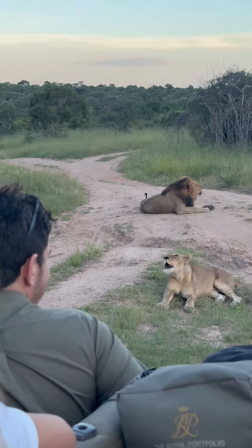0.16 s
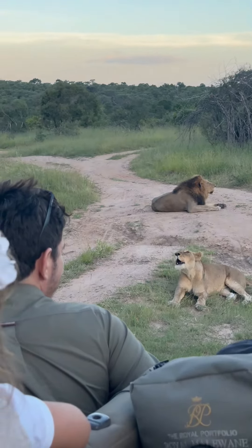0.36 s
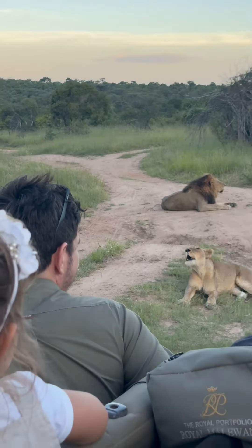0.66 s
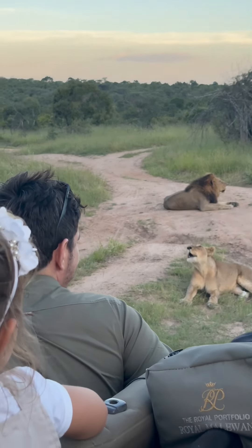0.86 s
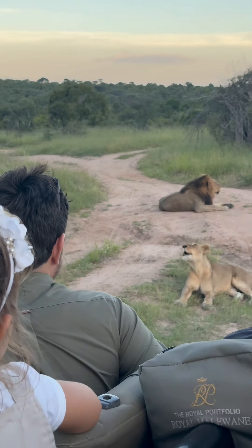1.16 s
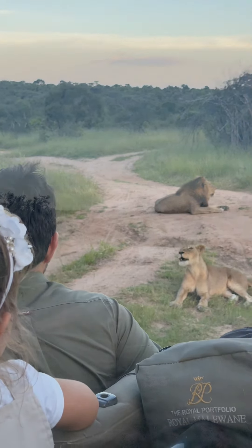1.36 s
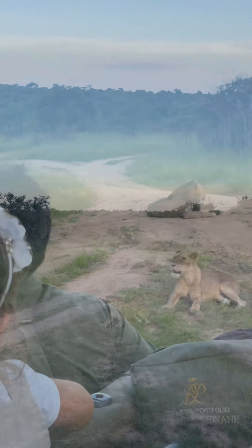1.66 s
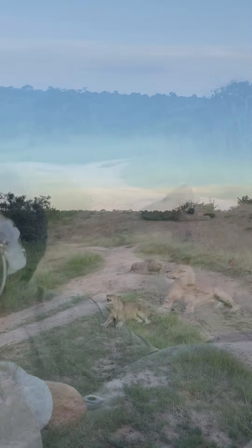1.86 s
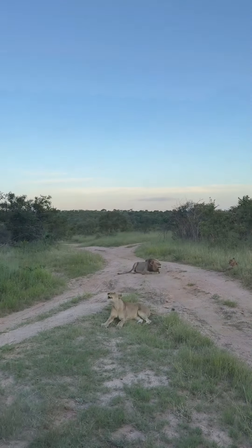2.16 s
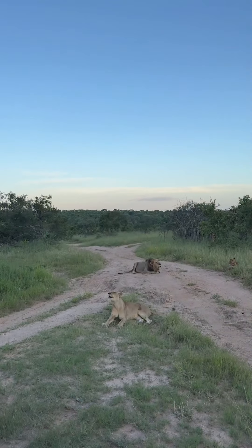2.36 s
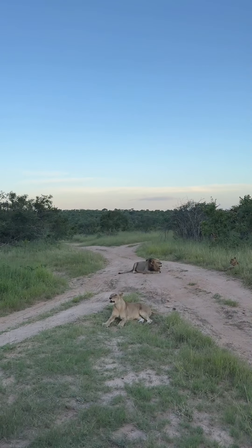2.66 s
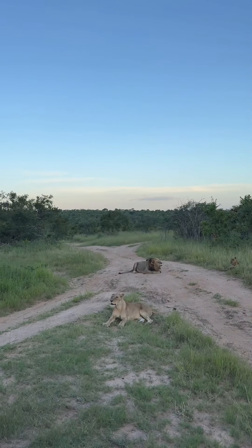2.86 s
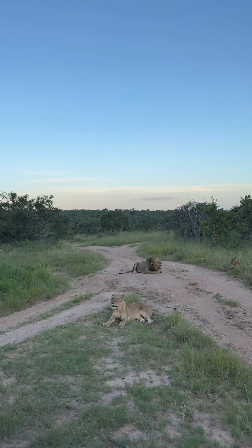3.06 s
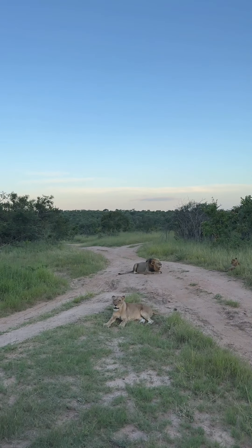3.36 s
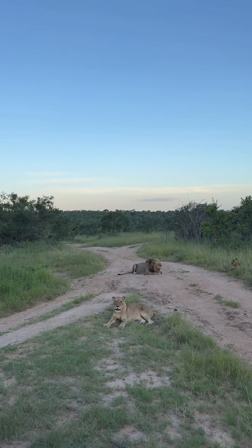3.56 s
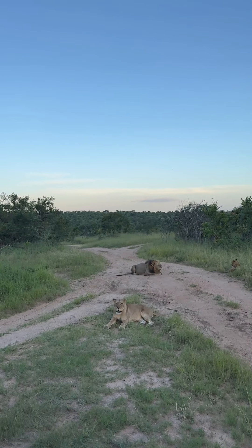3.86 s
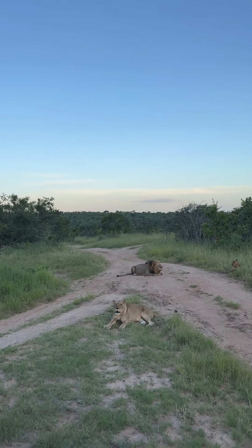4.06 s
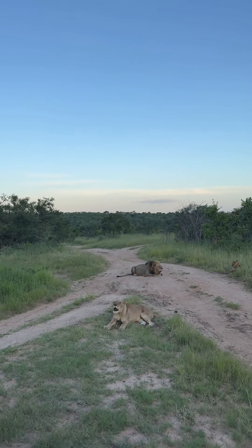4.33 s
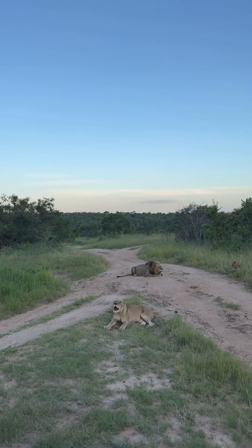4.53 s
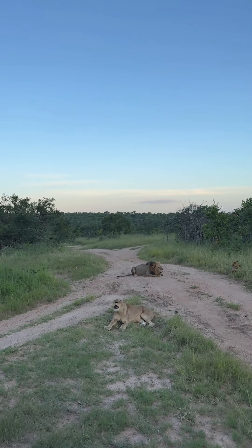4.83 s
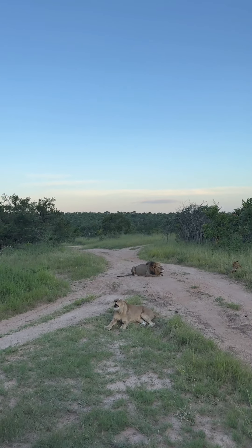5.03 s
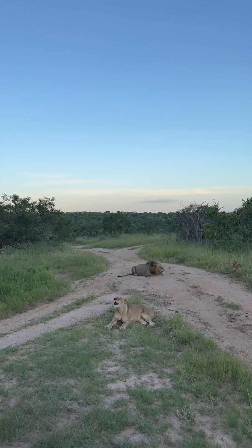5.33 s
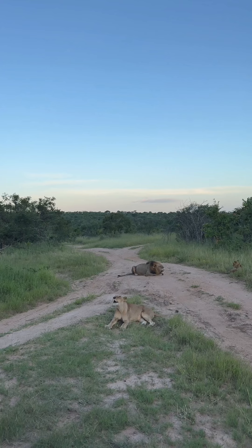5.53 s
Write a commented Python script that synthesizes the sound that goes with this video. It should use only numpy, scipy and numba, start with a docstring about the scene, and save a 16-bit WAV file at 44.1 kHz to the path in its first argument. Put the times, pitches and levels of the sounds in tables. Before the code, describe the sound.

Two lions roar in turn near a handheld stereo microphone: three heavy falling bellows in quick succession, the first facing, the next off to the left. A gap of about one second leaves low rumble, soft hiss and thin descending bird whistles. Then a throaty moan climbs, roughens into a creak and breaks into a last loud bellow, cut off in its growl. Short diffuse outdoor echo.

```python
"""Two lions roar close by in open bush: creaky swells and full bellows that fall into a growl.
Vocal folds give a harmonic stack; turbulent air, puffed unevenly, rasps through throat and mouth resonances.
Loose tissue flaps and slaps in the growl, near-pure chest notes glide beneath, and small birds whistle.
The bush rumbles, hisses and echoes briefly; a microphone pair turns aside after the first roar,
and the loudest cycles flatten near full scale."""
import sys
import numpy as np
from scipy import signal
from scipy.fft import rfft, irfft
from scipy.io import wavfile
from scipy.ndimage import uniform_filter1d
from numba import njit

SR = 44100
rng = np.random.default_rng(int(sys.argv[2]) if len(sys.argv) > 2 else 0)


def file_out(sig):
    """Save sig as 16-bit WAV at sys.argv[1]."""
    # one column per channel
    cols = np.atleast_2d(sig).T
    # limit, then scale
    lim = np.clip(cols, -1, 1)
    pcm = np.round(lim * 32767).astype(np.int16)
    wavfile.write(sys.argv[1], SR, pcm)


N = 250929

# vocal tract: (time [s], mouth opening [0-1], first resonance [Hz], airflow offset [dB])
THROAT = [(0, 0.52, 460, 2), (.3, 0.24, 463, 1.5), (.6, 0.06, 453, 4), (.95, 0.08, 442, 2),
          (1.2, 0.03, 386.4, 1), (1.345, 0.04, 393, -0.5), (1.365, 1, 447, -5), (1.55, .7, 442, 4.5),
          (1.72, 0.3, 452, -0.5), (1.901, 0.05, 427, 0.5), (2.3, 0.02, 391, -1.5), (2.36, 0.01, 395, -4),
          (2.42, 0, 387.4, -11.5), (2.5, 0.2, 387.4, -3), (2.62, 0.3, 381.6, -2), (2.85, 0.27, 357, -4.5),
          (3.0, 0.2, 337, 3.5), (3.2, 0.12, 317, 8.5), (4.12, 0.23, 393.3, 4), (4.3, 0, 429.5, 6),
          (4.39, 0.3, 406, 2.5), (4.46, 0.7, 416, -1), (4.62, 0.7, 424, 1.5), (4.68, 0.93, 457, -4),
          (4.76, 0.86, 490, -3), (4.86, 0.7, 485, 6.5), (4.97, 0.52, 456, 4), (5.05, 0.1, 470, -1),
          (5.12, 0.1, 447, -5.5), (5.33, 0.07, 401, 0.5), (5.42, 0.07, 405, 1), (5.46, 0.03, 403, -5),
          (5.52, 0, 417, -0.5), (5.62, 0.02, 412, -4), (5.69, 0.01, 418, -3.5)]
# mouth resonances facing, turned aside and wide open: (centre [Hz], width per pass [Hz], relative level [dB])
MOUTH_FACING = [(2215, 120, -1), (2518, 130, -6.5), (2940, 260, -9.5), (3450, 290, -7), (3940, 470, -6.5),
                (4750, 1700, -11.5), (6300, 1000, -7), (7120, 320, -8.5), (7800, 510, -7),
                (8730, 1000, -8.5), (10070, 1800, -9)]
MOUTH_ASIDE = [(2270, 540, -2), (2860, 620, -4.5), (3400, 240, -2), (3900, 1300, -6.5), (4710, 530, -8.5),
               (5140, 1500, -1), (6600, 1100, -10.5), (8730, 3300, -4)]
MOUTH_WIDE = [(2820, 270, -3.5), (3440, 270, -8.5), (4630, 760, -10.5), (5240, 390, -19), (5870, 450, -6),
              (6950, 1000, -13.5), (8050, 2000, -9.5), (9600, 2600, -8.5)]


def undb(db):
    """Decibels to amplitude ratio: 20 dB is a factor of ten."""
    return 10 ** (np.asarray(db) / 20)


def unit(x):
    """Normalisation to a root-mean-square of one."""
    return x / np.sqrt(np.mean(x ** 2))


@njit
def svf(x, hz, width):
    """Second-order resonator: a state-variable band-pass with moving centre and width, gain 1 at the centre."""
    y, b, l = np.empty(len(x)), 0., 0.
    for i in range(len(x)):
        g, k = np.tan(np.pi * hz[i] / SR), width[i] / hz[i]
        v = (b + g * (x[i] - l)) / (1 + g * (g + k))
        b, l, y[i] = 2 * v - b, l + 2 * g * v, k * v
    return y


def ring(x, hz, width, db):
    """Cascaded resonance: two equal passes steepen the skirts."""
    hz, width = hz * np.ones(len(x)), width * np.ones(len(x))
    return undb(db) * unit(svf(svf(x, hz, width), hz, width))


def walk(n, rate):
    """Low-passed random fluctuation: levels held 1 / rate s, smoothed twice; spread near 1."""
    k = int(SR / rate)
    held = np.repeat(rng.standard_normal(n // k + 1), k)
    return 1.3 * uniform_filter1d(uniform_filter1d(held, k), k)[:n]


def read(table, fade_s=0.037):
    """Linear interpolation of a time curve: its sample range, columns and edge fades."""
    s, *columns = np.transpose(table)
    at = np.arange(int(s[0] * SR), min(int(s[-1] * SR), N))
    t = at / SR
    # no fade where the curve meets either end of the sound
    since_start, until_end = t - s[0] + (at[0] == 0), s[-1] - t + (at[-1] == N - 1)
    fade = np.clip(np.minimum(since_start, until_end) / fade_s, 0, 1)
    return at, [np.interp(t, s, c) for c in columns], fade


def on_hz(table, hz):
    """Spectral interpolation on a logarithmic frequency axis."""
    f, v = np.transpose(table)
    return np.interp(np.log(hz + 1), np.log(f + 1), v)


def bush():
    """Spectrally shaped noise: wavering rumble and hiss, most alike left and right in the bass."""
    # ambient spectrum before overall scaling: (frequency [Hz], relative level [dB])
    spectrum = [(18, -33.5), (30, -4), (66, -4), (134, -17), (245, -33), (461, -40), (526, -46),
                (2750, -47), (5740, -47.5), (7670, -49.5), (9710, -71), (16000, -70.5)]
    rms_db = -58.5
    hz = np.fft.rfftfreq(N, 1 / SR)
    shape = undb(on_hz(spectrum, hz))
    mid, side = (rfft(rng.standard_normal(N) * undb(1.5 * walk(N, 6.4))) * shape for _ in range(2))
    side_share = np.clip(hz / 2500, .1, 1)
    both = irfft(mid + side_share * side * np.array([[1], [-1]]), N)
    return unit(both) * undb(rms_db)


def reverberate(x, tail, db):
    """Reverberation as convolution with decaying noise, scaled by the mean energy of the two tails."""
    tail = tail / np.sqrt(np.sum(tail ** 2) / 2) * undb(db)
    return signal.fftconvolve(x[None], tail, axes=1)[:, :N]


def bush_echo(x):
    """Diffuse echo: close ports hear nearly the same bass, so mainly the treble differs."""
    t60_s, level_db, top_hz = 0.57, -24, 3000
    t = np.arange(SR) / SR
    # the first 12 ms stay silent
    mid, side = rng.standard_normal((2, SR)) * np.exp(-np.log(1000) * t / t60_s) * (t > .012)
    side = signal.sosfilt(signal.butter(1, 900, "high", fs=SR, output="sos"), side)
    tail = signal.sosfilt(signal.butter(1, top_hz, fs=SR, output="sos"), [mid + side, mid - side])
    return reverberate(x, tail, level_db)


def scatter(x):
    """Early scattering: brief treble reflections off nearby seats and bodies, different at each port."""
    t60_s, level_db, low_hz = 0.042, -2, 2160
    t = np.arange(int(SR * t60_s)) / SR
    tail = rng.standard_normal((2, len(t))) * np.exp(-np.log(1000) * t / t60_s)
    bright = signal.sosfilt(signal.butter(2, low_hz, "high", fs=SR, output="sos"), x)
    return reverberate(bright, tail, level_db)


def two_ports(x, left_lead, left_excess_db):
    """Interaural-type cues: phase lead [rad] and level difference [dB], split between the two ports."""
    half = np.array([[.5], [-.5]])
    return irfft(rfft(x) * undb(half * left_excess_db) * np.exp(1j * half * left_lead), N)


def microphone_pair(x):
    """Directional hearing: arrival phase and shading crossfade as the pair turns and the source changes."""
    # phase when facing: (frequency [Hz], left lead [rad])
    facing_phase = [(60, 0), (6500, 0), (7400, -.3), (8700, -1.4), (11000, -2.0)]
    # phase side-on: (frequency [Hz], left lead [rad])
    side_phase = [(60, .2), (200, .11), (520, .4), (800, -.1), (2100, 0), (2800, -.8), (3400, .4),
                  (4000, 1.5), (4700, -1.0), (7400, -1.6), (10000, -2.7)]
    # shading side-on: (frequency [Hz], left minus right level [dB])
    side_level = [(60, -0.5), (110, 1), (200, 1), (520, 1.5), (700, 10), (900, 2), (1450, 0.5), (1750, 0.5),
                  (2600, 1), (3400, -5.5), (4400, 4), (8000, 0.5)]
    # a roar from far to the left: (frequency [Hz], left lead [rad], left minus right level [dB])
    left_cues = [(200, .1, 1.5), (370, .5, 3), (700, 2.0, 3), (900, .1, 6), (1150, .6, 14), (1450, 0, 8),
                 (1750, .5, 1), (2400, 2.5, 2), (3400, 1.7, -4), (4000, -1.8, 0), (9000, -2.6, 1)]
    turn_s = 1.3, 1.6  # from facing to side-on
    left_until_s = 2.36, 2.46  # the second roar is at the left, then the sound moves to the side-on cues
    facing_scatter = 0.1  # share of the scatter heard while facing
    t, hz = np.arange(N) / SR, np.fft.rfftfreq(N, 1 / SR)
    facing = two_ports(x, on_hz(facing_phase, hz), 0)
    side_on = two_ports(x, on_hz(side_phase, hz), on_hz(side_level, hz))
    left_hz, left_phase, left_db = np.transpose(left_cues)
    left = two_ports(x, np.interp(hz, left_hz, left_phase), np.interp(hz, left_hz, left_db))
    turned = left + np.interp(t, left_until_s, (0, 1)) * (side_on - left)
    turn = np.interp(t, turn_s, (0, 1))
    scatter_share = facing_scatter + (1 - facing_scatter) * turn
    return facing + turn * (turned - facing) + scatter_share * scatter(x)


def whistle(table, flutter_db, rate, fade_s):
    """Frequency modulation: a lone sine follows a pitch curve while its level wavers."""
    at, (hz, db), fade = read(table, fade_s)
    level = undb(db + flutter_db * walk(len(at), rate))
    out = np.zeros(N)
    out[at] = np.sqrt(2) * fade * level * np.sin(2 * np.pi * np.cumsum(hz) / SR)
    return out


def birds():
    """Pure-tone whistles: thin glides, mostly falling, that steepen near the end."""
    # whistles: (start [s], length [s], first pitch [Hz], last pitch [Hz], level [dB])
    bird_calls = [(1.403, 0.048, 3730, 4270, -58), (1.442, 0.07, 3050, 3230, -74),
                  (3.082, 0.19, 6300, 4000, -77.5), (3.405, .21, 6400, 3940, -79),
                  (3.506, 0.12, 6000, 5350, -86), (3.73, .2, 6300, 3900, -79.5),
                  (3.998, 0.031, 5930, 5510, -83), (4.064, .2, 6300, 3900, -82)]
    knee_time, knee_glide = .76, .64  # shares of length and glide passed at the bend
    out = 0
    for s, length, first_hz, last_hz, db in bird_calls:
        knee_hz = first_hz + knee_glide * (last_hz - first_hz)
        curve = [(s, first_hz, db), (s + knee_time * length, knee_hz, db), (s + length, last_hz, db)]
        out = out + whistle(curve, 2.9, 40, fade_s=0.016)
    return out


def chest_notes():
    """Amplitude modulation: gliding sines whose throb deepens through each note."""
    # near-pure notes: (start [s], length [s], first pitch [Hz], last pitch [Hz],
    # first level [dB], last level [dB], signed throb depth at the end [dB])
    low_notes = [(.14, 0.46, 187.6, 188.2, -22.5, -26.5, 19.5), (1.76, 0.44, 122.9, 128.9, -21, -18.5, -3),
                 (4.122, .27, 99.7, 149, -39, -45, -11)]
    throb_hz, throb_turns = 9.5, 0.12  # rate and starting phase in cycles
    t, out = np.arange(N) / SR, 0
    for s, length, first_hz, last_hz, first_db, last_db, throb_db in low_notes:
        depth_db = throb_db * np.clip((t - s) / length, 0, 1)
        throb = depth_db * np.sin(2 * np.pi * (throb_hz * (t - s) + throb_turns))
        curve = [(s, first_hz, first_db), (s + length, last_hz, last_db)]
        out = out + undb(throb) * whistle(curve, 0.74, 5.8, fade_s=.06)
    return out


def throat(air, t, mouth, growl, first_db, second_hz, second_db, fourth_db):
    """Source-filter principle: air excites gliding throat formants, dull steady bands and mouth bands."""
    s, *columns = np.transpose(THROAT)
    opening, first_hz = (np.interp(t, s, c) for c in columns[:2])
    opening = np.clip(opening, 0, 1)
    # the third and fourth resonances sink as the mouth narrows, the fourth late
    third_hz = 1170.5 + (2052.5 - 1170.5) * opening
    third_db = -6.5 + (-7.5 + 6.5) * opening
    fourth_hz = 1800 + (2400 - 1800) * opening ** .7
    # flapping tissue blurs the resonances and damps the fourth
    blur, fourth_db = 1 + .7 * growl, fourth_db - 3 * growl
    rasp = ring(air, first_hz, 105 * blur, first_db) - ring(air, second_hz, 115 * blur, second_db)
    rasp = rasp + ring(air, third_hz, 130 * blur, third_db) - ring(air, fourth_hz, 190 * blur, fourth_db)
    rasp = rasp + ring(air, 211.5, 82, 6.7) + ring(air, 310, 72, -3.5)
    rasp = rasp - ring(air, 636, 150, -12.0) + ring(air, 1326, 280, -11.5)
    rasp = rasp + growl * ring(air, 1550, 600, -10)  # torn air fills the gaps between them
    # each treble band drifts and flickers at random on its own
    hiss = 0
    for k, (hz, width, db) in enumerate(mouth):
        drift_hz = hz * (1 + .012 * walk(len(t), 2.2))
        hiss = hiss + (-1) ** k * ring(air, drift_hz, width, db + 2.0 * walk(len(t), 17))
    return rasp, hiss


def slap_group(rows, mouth):
    """Impulsive excitation: short bursts of air ring throat and mouth; the harder, the brighter."""
    rise_s, fall_s, hard_db = 0.0034, 0.0098, -18.5  # a smoothed burst below hard_db loses treble
    t, gate = np.arange(N) / SR, np.zeros(N)
    for s, db in rows:
        gate += undb(db) * np.clip((t - s) / rise_s, 0, 1) * np.exp(-np.abs(t - s) / fall_s)
    air = gate * rng.standard_normal(N)
    rasp, hiss = throat(air, t, mouth, 1, first_db=14, second_hz=861, second_db=-2, fourth_db=-23)
    bright = np.sqrt(np.clip(uniform_filter1d(gate, size=600) / undb(hard_db), 0, 1))
    return np.sqrt(np.mean(gate ** 2)) * undb(-13.0) * (rasp + undb(-10.5) * bright * hiss)


def slaps():
    """Time-varying filtering: the hardest slaps of the growl ring three sets of mouth resonances in turn."""
    # slaps: (time [s], relative strength [dB])
    slap_rows = [(0.205, -25.5), (0.285, -23.5), (0.365, -19), (0.604, -20), (0.632, -24), (0.711, -16),
                 (1.095, -16.5), (1.131, -11), (1.156, -12), (1.189, -13), (1.204, -13), (1.226, -13),
                 (1.243, -17.5), (1.267, -28.5), (1.292, -28.5), (1.348, -26.5), (2.07, -19), (2.1, -17.5),
                 (2.143, -15), (2.218, -20.5), (2.263, -13), (2.294, -18.5), (2.326, -17.5), (2.385, -33),
                 (2.41, -31.5), (2.434, -35.5), (2.491, -28), (5.424, -21.5), (5.477, -16.5), (5.489, -7),
                 (5.507, -19.5), (5.553, -19.5), (5.581, -13.5), (5.598, -13), (5.639, -12.5)]
    aside_s, wide_s = 1.0, 4.64  # the mouth's colour changes at these times
    spans = (0, aside_s, MOUTH_FACING), (aside_s, wide_s, MOUTH_ASIDE), (wide_s, N / SR, MOUTH_WIDE)
    return sum(slap_group([row for row in slap_rows if a <= row[0] < b], mouth) for a, b, mouth in spans)


def lion(table, register, mouth, tract, tilt_db, air_db, edge_db, slide_s, rough, growl):
    """Phonation: folds ring as a harmonic stack, air rasps once a cycle, loose tissue flaps it into a growl.

    tract: the arguments of throat after growl; tilt_db: slope above the strongest partial [dB per octave];
    air_db, edge_db: rasp against voice and hiss against rasp before the later offsets [dB];
    rough, growl: depths [0-1] before and after the slide between two times slide_s [s].
    """
    at, (hz, db), fade = read(table)
    n, t = len(at), at / SR
    rough, growl = np.interp(t, slide_s, rough), np.interp(t, slide_s, growl)
    # a full growl spills more air, and duller air
    rasp_db = db + air_db + 12.5 * growl + np.interp(t, *np.transpose(THROAT)[[0, 3]])
    hiss_db = rasp_db + edge_db - 12.5 * growl
    phase = np.cumsum(hz * (1 + .06 * rough * walk(n, 150))) / SR
    flap_hz = 42.2 * (1 + .3 * walk(n, 30))
    flap = np.cumsum(flap_hz) / SR % 1
    puff = 1 - growl + 2.07 * growl * np.exp(-flap / 0.59) * undb(2.6 * walk(n, 40))

    lead_k, lead_db = max(register, key=lambda row: row[1])
    slope_db = tilt_db - 8 * growl
    stack = 0
    for k, d in register:
        # uneven folds make each partial flutter alone, higher ones more; a leading fundamental is steadier
        flutter = 0.69 if k == 1 == lead_k else 1 + .03 * k
        flutter_db = 5.46 * flutter * rough * walk(n, 70)
        # soft closure and growl tilt the upper partials down
        tilt = slope_db * max(np.log2(k / lead_k), 0)
        level = undb(flutter_db + d - lead_db + tilt)
        stack = stack + level * np.sin(2 * np.pi * (k * phase + rng.random()))
    soft_puff = uniform_filter1d(puff, size=300)
    voice = np.sqrt(2) * undb(db) * stack * (1 + 0.29 * (soft_puff - 1))

    jet = .8 + np.exp(-(phase % 1) / .25)  # air spurts as the folds part
    air = rng.standard_normal(n) * puff * jet * undb(1.9 * walk(n, 60))
    closure = uniform_filter1d(np.diff(np.floor(phase), prepend=0), size=3)  # the folds snap shut once a cycle
    air = air + .42 * (1 - rough) * puff * unit(closure) * undb(2.0 * walk(n, 200))
    rasp, hiss = throat(air, t, mouth, growl, *tract)
    rumble = growl * undb(rasp_db) * ring(air, 62, 30, -2.0)  # the flapping itself, felt in the chest
    out = np.zeros(N)
    out[at] = fade * (voice + undb(rasp_db - 3.0) * rasp + undb(hiss_db - 7.5) * hiss + rumble)
    return out


def roars():
    """Vocal registers: phrases differ in pitch, level and roughness; some share harmonic balance or mouth."""
    # phrases: (time [s], fold rate [Hz], strongest partial level [dB])
    creak_1, bellow_1 = [(0.0, 152, -22.5), (0.052, 152.6, -17), (0.304, 153, -16), (0.584, 144.6, -16.5),
                         (0.63, 137, -30.5)], [(0.54, 184.6, -27), (0.56, 184.1, -14), (0.61, 182.1, -8),
                                          (0.656, 179.6, -3.5), (0.904, 176.6, -3.5), (0.992, 157.1, -6.5),
                                          (1.198, 141.3, -6), (1.27, 118.8, -17), (1.38, 98.5, -36)]
    creak_2, bellow_2 = [(1.34, 79.23, -41.5), (1.564, 76.74, -34), (1.66, 71.8, -26.5),
                         (1.72, 69.2, -22.5)], [(1.67, 211, -37.5), (1.714, 194.9, -15), (1.79, 188.4, -10.5),
                                          (1.884, 186.5, -7.5), (2.188, 158, -7), (2.306, 139.8, -8.5),
                                          (2.38, 141.3, -13.5), (2.47, 134.3, -30)]
    mate_bellow, moan = [(2.38, 136.4, -14.5), (2.438, 136.9, -15.5), (2.79, 128.8, -10.5),
                         (2.968, 124.9, -9.5), (3.0, 120, -10.5), (3.092, 105.4, -14.5), (3.22, 89, -49)], [(4.1, 72.2, -60), (4.13, 75.57, -38.5), (4.162, 81.35, -27),
                                              (4.25, 98.14, -19), (4.324, 115.6, -22.5),
                                              (4.398, 127.9, -25.5), (4.58, 126, -23), (4.69, 131, -17)]
    creak_3, bellow_3 = [(4.64, 85.77, -19), (4.754, 75.12, -18), (4.885, 73.45, -20.5),
                         (5.07, 77.7, -15.5)], [(5.02, 192.6, -14), (5.078, 185.8, -6.5), (5.346, 171.8, -5),
                                          (5.518, 155.5, -4.5), (5.69, 153.7, -10)]
    # registers before tilt: (multiple of the fold rate [1], relative level [dB])
    open_creak, closed_creak = [(1, -4.5), (2, -11), (3, 2), (4, -11.5), (5, -26), (6, -21), (7, -37.5),
                                (8, -25.5), (9, -32), (10, -24.5), (11, -33.5), (12, -35.5), (13, -39.5),
                                (14, -32.5), (15, -29), (16, -37.5)], [(1, -41.5), (2, -12.5), (3, 1), (4, -15.5), (5, -15.5),
                                                    (6, -1), (7, -15), (8, -21), (9, -15), (10, -11.5)]
    chest, full_chest = [(1, -2.5), (2, -18), (3, -16.5), (4, -40.5), (5, -28.5), (6, -56), (7, -22.5),
                         (8, -29.5), (9, -35.5), (10, -30.5), (11, -34.5), (12, -40), (13, -39.5)], [(1, 0), (2, -17), (3, -16.5), (4, -33), (5, -26.5), (6, -35),
                                        (7, -19.5), (8, -33)]
    mate_chest, clear_chest = [(1, 0.5), (2, -39.5), (3, -17.5), (4, -40), (5, -53), (6, -59.5), (7, -63.5),
                               (8, -41), (9, -44), (10, -45), (11, -49)], [(1, 0.5), (2, -21), (3, -18.5), (4, -37), (5, -23),
                                                   (6, -44), (7, -27), (8, -31), (9, -38.5), (10, -36),
                                                   (11, -31), (12, -40.5), (13, -48), (14, -50)]
    hum = [(1, -16.5), (2, 6), (3, -9), (4, -4.5), (5, -9), (6, -17), (7, -17.5), (8, -13), (9, -36),
           (10, -39.5), (11, -24)]
    # mouth resonances: (centre [Hz], width per pass [Hz], relative level [dB])
    mouth_mate, mouth_moan = [(2300, 540, 1), (3050, 590, -3), (3670, 400, -5), (4930, 1400, -6),
                              (5900, 760, -8), (7840, 3500, -9)], [(2255, 190, -0.5), (2790, 210, -11), (3300, 200, -4.5),
                                                  (4840, 1200, -9.5), (6300, 2000, -9.5), (7900, 1700, -5)]
    mouth_bellow = [(2570, 350, -10.5), (3365, 430, -7.5), (4660, 1200, -14.5), (5360, 390, -10),
                    (5870, 600, -5.5), (6840, 1100, -14), (8060, 2400, -14), (9660, 2000, -12.5)]
    # tract: (first resonance level [dB], second resonance [Hz], its level [dB], fourth level [dB])
    return (
        lion(creak_1, open_creak, MOUTH_FACING, (9, 895, -5, -28), tilt_db=-2, air_db=-17, edge_db=-7,
             slide_s=(0, .3), rough=(.1, .37), growl=(.05, .28))
        + lion(bellow_1, full_chest, MOUTH_FACING, (5, 850, -6, -16), tilt_db=-4, air_db=-27, edge_db=-8,
               slide_s=(0.93, 1.17), rough=(.2, .5), growl=(.06, .8))
        + lion(creak_2, closed_creak, MOUTH_ASIDE, (11, 890, -1, -19), tilt_db=-1, air_db=-15, edge_db=-13,
               slide_s=(1.4, 1.7), rough=(.5, .4), growl=(.5, .2))
        + lion(bellow_2, chest, MOUTH_ASIDE, (5, 850, 2, -12), tilt_db=-4, air_db=-24, edge_db=-10,
               slide_s=(1.85, 2.2), rough=(.2, .38), growl=(.1, .6))
        + lion(mate_bellow, mate_chest, mouth_mate, (8, 850, -9, -22), tilt_db=-1.2, air_db=-35, edge_db=-9,
               slide_s=(2.82, 3.0), rough=(.27, .38), growl=(.05, .55))
        + lion(moan, hum, mouth_moan, (14, 820, -1, -21), tilt_db=-2, air_db=-22, edge_db=-11,
               slide_s=(4.34, 4.47), rough=(.38, .1), growl=(.25, 0))
        + lion(creak_3, closed_creak, MOUTH_WIDE, (8, 915, -1.5, -17), tilt_db=-1.5, air_db=-16.5, edge_db=-12,
               slide_s=(4.72, 4.85), rough=(.3, .48), growl=(.15, .25))
        + lion(bellow_3, clear_chest, mouth_bellow, (2, 865, -1, -10), tilt_db=-0.2, air_db=-26, edge_db=-1,
               slide_s=(5.32, 5.41), rough=(.14, .42), growl=(0, .7)))


def scene():
    """Superposition: direct sound at the two ports, the echo and the bush add linearly."""
    sources = birds() + chest_notes() + slaps() + roars()
    return microphone_pair(sources) + bush_echo(sources) + bush()


def record(dry):
    """Band limiting and saturation: deep bass is lost, the tallest cycles flatten, the top is cut."""
    thin = signal.sosfilt(signal.butter(4, 46, "high", fs=SR, output="sos"), dry)
    flat = thin / (1 + np.abs(thin) ** 8) ** (1 / 8)
    return signal.sosfilt(signal.ellip(8, .2, 70, 16800, fs=SR, output="sos"), flat)


dry = scene()
out = record(dry)
file_out(out)
```